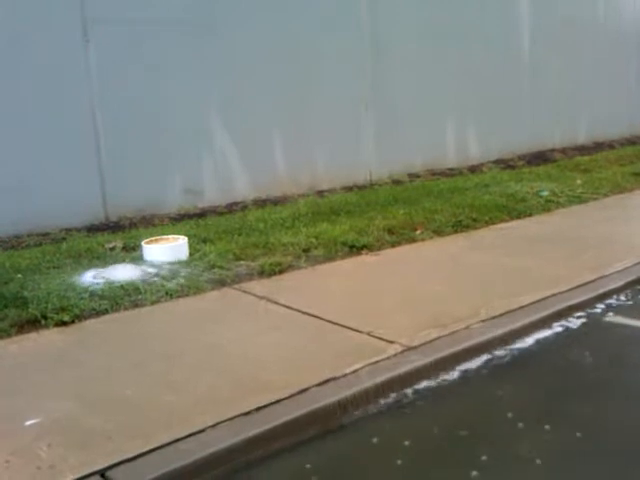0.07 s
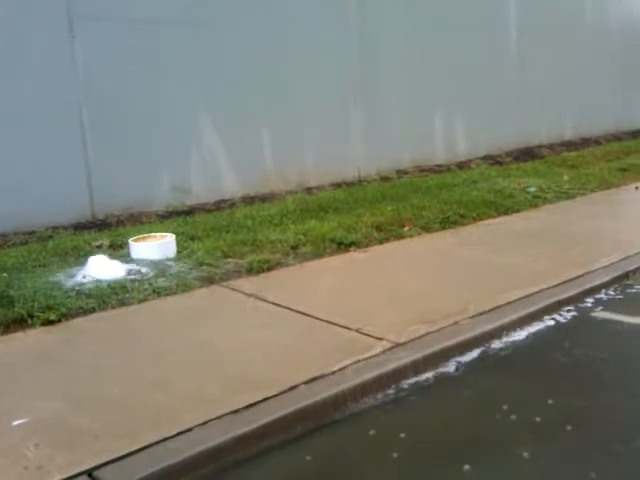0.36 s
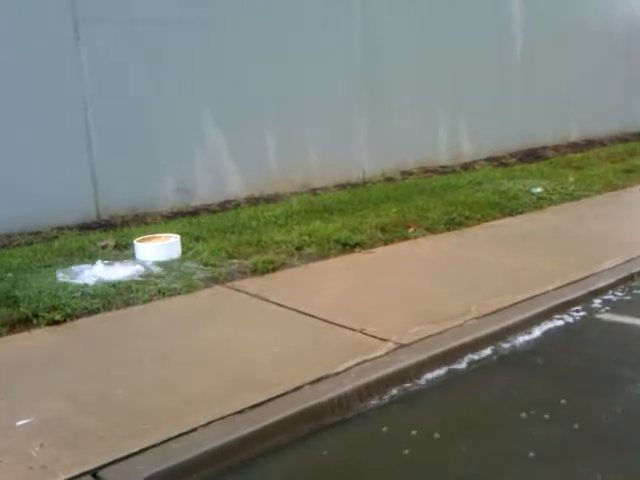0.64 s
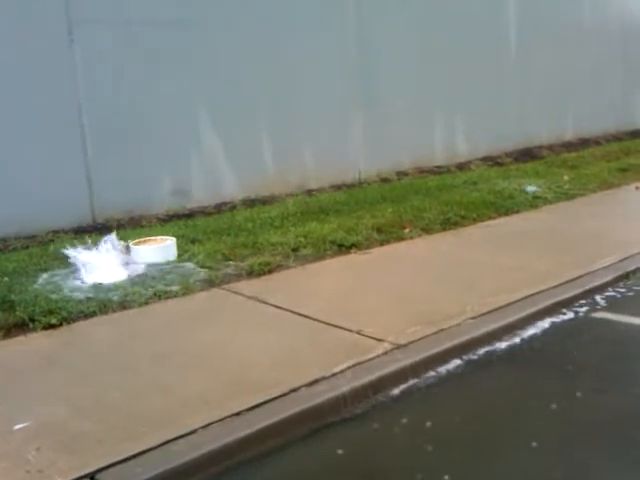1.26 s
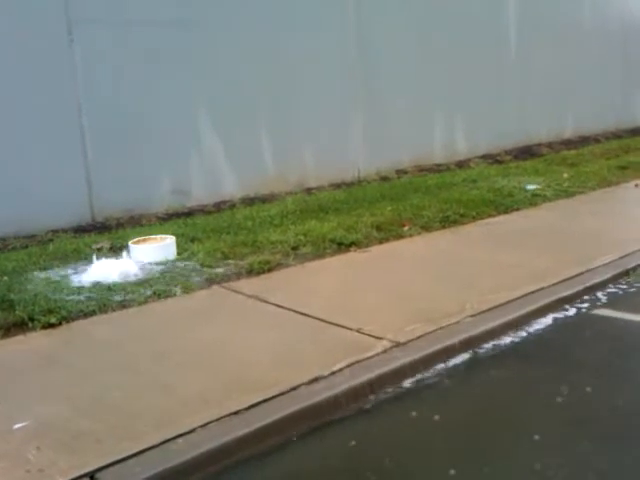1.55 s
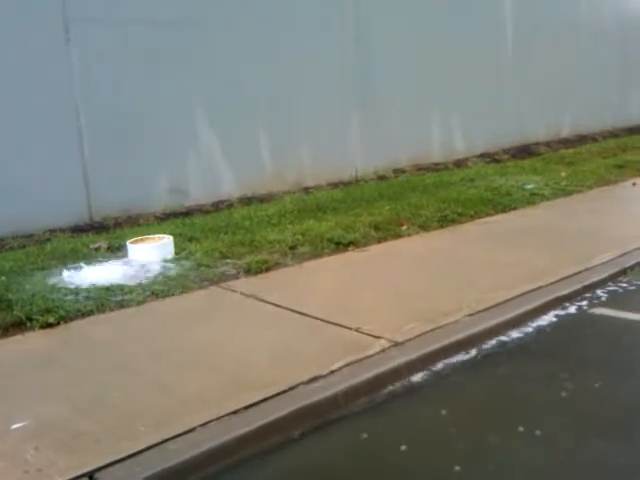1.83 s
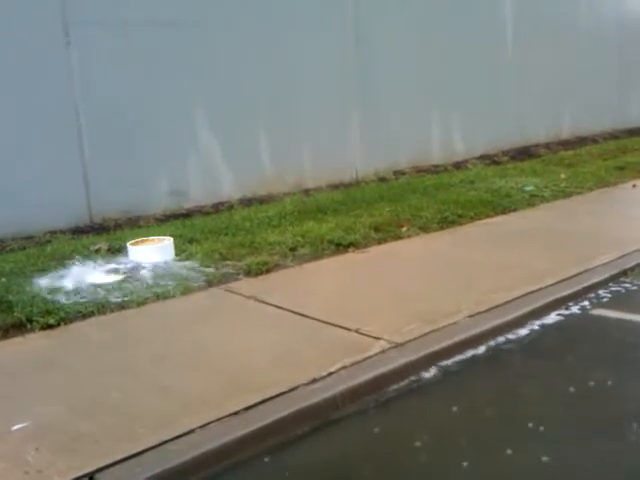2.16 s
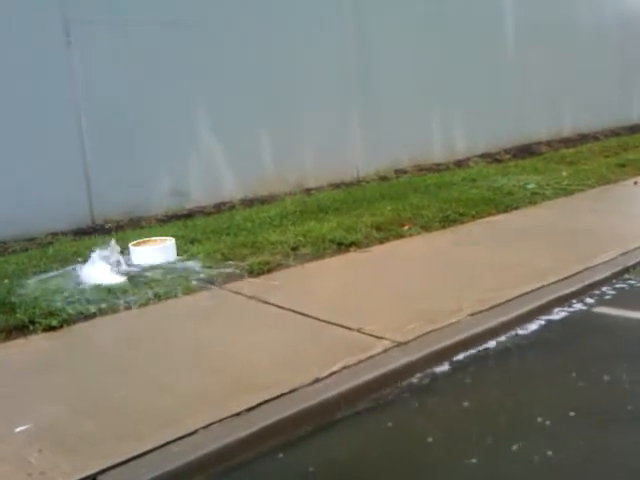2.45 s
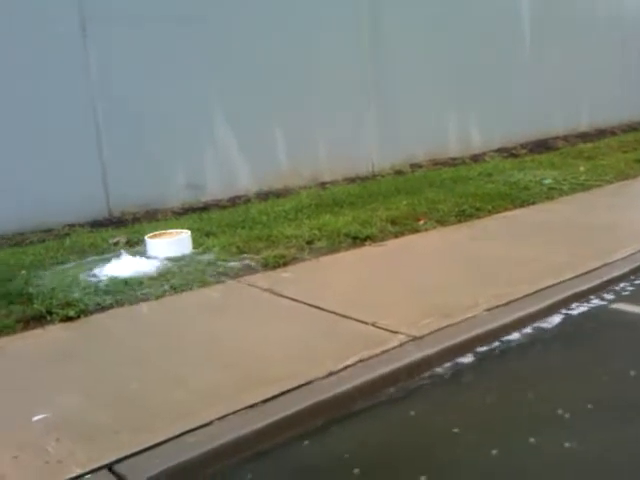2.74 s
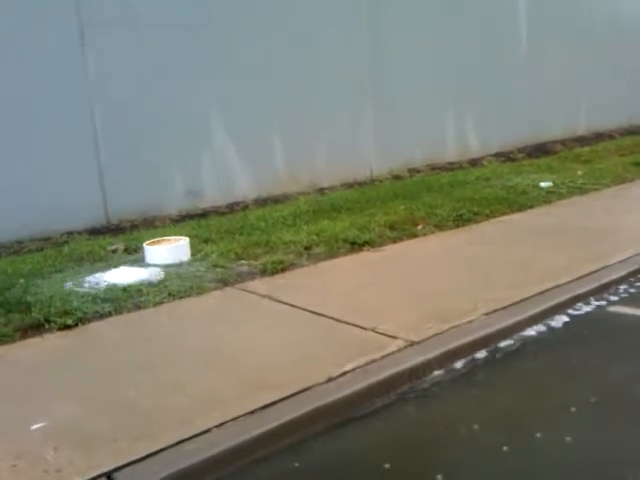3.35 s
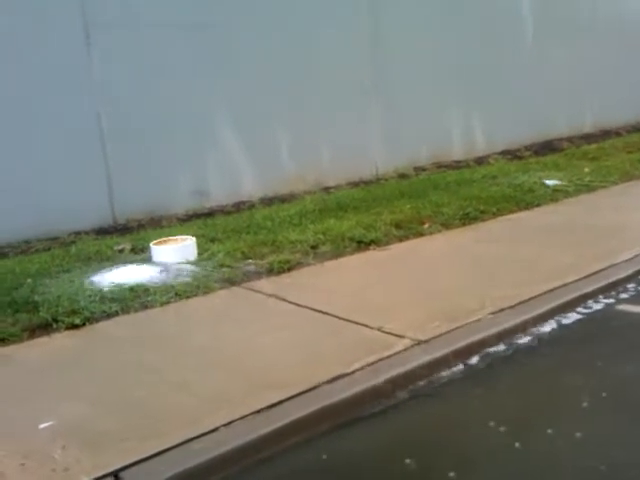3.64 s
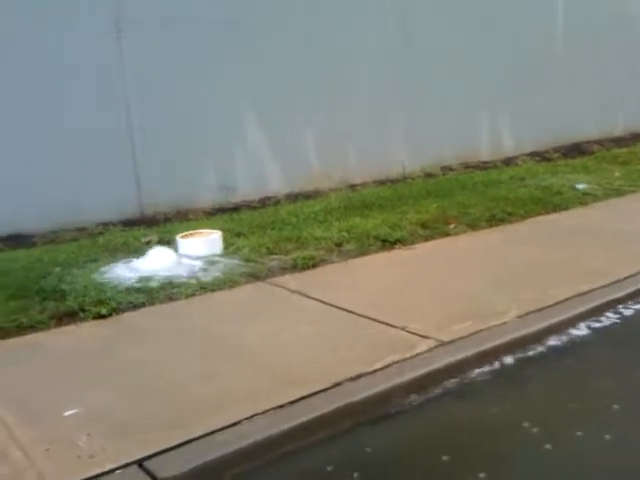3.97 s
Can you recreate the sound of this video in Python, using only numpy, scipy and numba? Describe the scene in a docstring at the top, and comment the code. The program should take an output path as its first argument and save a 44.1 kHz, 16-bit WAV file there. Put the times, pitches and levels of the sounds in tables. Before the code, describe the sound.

Steady rain fizzes on a flooded road edge while welling water splashes and gulps.

```python
"""Steady rain on a flooded road edge, with water welling up beside a pipe in the verge.
Countless tiny bubbles, each a decaying sine, make the rush, a brighter fizz and a fine spray.
Near drops tick, a thin ring swells, the outflow splashes and its large bubbles gulp.
Wall and pavement reflect the water. Under it lie a low rumble and puffs of air,
and a faint hum that comes and goes."""
import sys
import numpy as np
from scipy import signal
from scipy.fft import rfft, irfft
from scipy.io import wavfile
from scipy.ndimage import uniform_filter1d
from numba import njit

SR = 44100
rng = np.random.default_rng(int(sys.argv[2]) if len(sys.argv) > 2 else 0)


def transcribe(signal):
    """Save signal, clipped to [-1, 1], as a 16-bit WAV file at the path in sys.argv[1]."""
    frames = np.atleast_2d(signal).T
    limited = np.clip(frames, -1, 1)
    pcm = np.round(limited * 32767).astype(np.int16)
    wavfile.write(sys.argv[1], SR, pcm)


N = 176400

# air rumble spectrum: f/Hz, relative level/dB
RUMBLE_EQ = [(10, -40), (25, -2), (36, 0), (60, -1), (100, 2.5), (130, -0.5), (170, -1.5), (240, -3),
             (340, -10.5), (600, -43.5)]
# air rumble envelope: t/s, level before trim/dB
RUMBLE_ENVELOPE = [(0, -51), (.06, -52.5), (.33, -52), (.55, -52.5), (.88, -54.5), (1.24, -51.5),
                   (1.45, -54.5), (1.75, -53), (1.95, -54.5), (2.5, -52.5), (2.95, -53.5), (3.12, -52.5),
                   (3.31, -56), (3.43, -46), (3.6, -58), (3.7, -52.5), (4, -52)]
# air puffs: peak t/s, sigma/s, centre f/Hz, level/dB
AIR_PUFFS = [(2.96, 0.019, 65, -48.5), (3.21, .028, 45, -48.5), (3.44, 0.017, 60, -49.5)]
# hum swells: peak t/s, sigma/s, f/Hz, level/dB
HUM_SWELLS = [(0.08, 0.07, 241, -44.5), (.31, 0.05, 242, -47), (.53, .03, 241, -48.5),
              (0.635, .035, 239, -48), (.795, .03, 241, -50.5), (1.265, 0.042, 361, -50),
              (3.746, 0.068, 240, -53)]
# thin ring swells: peak t/s, sigma/s, f/Hz, level/dB
RING_SWELLS = [(2.856, 0.012, 2310, -41.5), (3.705, 0.027, 1955, -43), (3.745, .045, 2250, -45.5),
               (3.968, 0.063, 2237, -46.5)]
# outflow splashes: peak t/s, sigma/s, centre f/Hz, band sigma/oct, level/dB
OUTFLOW_SPLASHES = [(0.663, 0.012, 1315, 0.37, -46), (1.045, .004, 5660, .3, -52),
                    (1.287, 0.014, 700, 1, -47), (1.327, 0.012, 1240, 0.92, -44),
                    (1.385, 0.014, 179, 0.29, -51), (2.11, 0.015, 2270, 0.083, -51),
                    (2.363, 0.049, 440, 0.8, -53.5), (2.856, 0.018, 690, 0.93, -49.5),
                    (3.057, 0.05, 900, 1, -52), (3.227, 0.046, 6000, 0.25, -60),
                    (3.376, 0.016, 340, 0.92, -48), (3.717, 0.026, 2040, 0.19, -45),
                    (3.82, .04, 1700, 0.28, -53), (3.97, 0.037, 2150, 0.19, -46.5)]
# large bubbles: peak t/s, sigma/s, f/Hz, glide/(oct/s), level/dB
OUTFLOW_GULPS = [(.08, .022, 120, 0, -46), (.17, .025, 140, 2, -47), (.32, 0.025, 135, -3, -49),
                 (.455, 0.012, 248, -3, -40.5), (1.375, 0.018, 364, 0, -44), (1.745, .011, 115, -4, -46),
                 (1.815, 0.011, 100, 0, -41.5), (2.18, .025, 420, -6, -52), (2.343, 0.016, 185, 8, -41.5),
                 (2.374, 0.004, 250, 7, -40), (2.59, .025, 410, 5, -52), (2.86, 0.012, 95, -5, -47),
                 (3.033, 0.016, 161, 2, -47), (3.362, 0.012, 250, -4, -41), (3.384, .008, 200, -7, -42),
                 (3.41, 0.022, 100, 0, -46)]
# near drops: peak t/s, sigma/s, f/Hz, level/dB
NEAR_DROPS = [(.1835, .0009, 2900, -41), (.9733, .0007, 3150, -40.5), (1.2128, .0008, 2900, -41),
              (1.4111, .0009, 2670, -34), (1.5626, .00055, 3250, -35.5), (1.7821, .00065, 2650, -30),
              (2.2547, .0006, 3300, -42), (2.529, .0007, 3090, -38.5), (2.8742, .0009, 2650, -38),
              (3.3832, .0006, 3060, -34), (3.6822, .0009, 1960, -34)]
# running water spectrum: f/Hz, relative level/dB
RUSH_EQ = [(200, -6.5), (350, 0.5), (480, -4), (750, -6), (1000, -6.5), (1300, -4), (1650, -4.5),
           (2100, -4), (2800, -7.5), (3400, -14.5), (4100, -20), (7000, -28.5)]
# spray spectrum: f/Hz, relative level/dB
SPRAY_EQ = [(3000, -22), (4000, -10.5), (4700, -3.5), (5500, 0.5), (6200, -3.5), (6800, -8), (7400, -19.5)]
# spray envelope: t/s, level before trim/dB
SPRAY_ENVELOPE = [(0, -60.5), (.06, -61), (.12, -69), (.35, -68), (.45, -63), (.6, -65.5), (.85, -70),
                  (1.2, -67.5), (1.55, -68.5), (1.66, -63.5), (1.8, -67), (1.87, -68.5), (2.68, -67.5),
                  (2.78, -65), (3.12, -68.5), (3.36, -63), (3.48, -65), (3.8, -62.5), (4, -62.5)]
# rain fizz spectrum: f/Hz, relative level/dB
FIZZ_EQ = [(1400, -27), (1850, -7.5), (2100, -7), (2300, -1), (2460, -4), (2680, -11.5), (3200, -20.5),
           (4200, -34)]
# rain fizz envelope: t/s, level/dB
FIZZ_ENVELOPE = [(0, -50), (.5, -49.5), (.9, -53), (1.55, -51), (1.8, -49), (2.2, -51.5), (2.75, -49.5),
                 (3.6, -51.5), (4, -47.5)]

TIME_S = np.arange(N) / SR
BIN_OCT = np.log2(np.maximum(np.arange(N // 2 + 1) * SR / N, 1))


def undb(db):
    """Decibels to gain."""
    return 10 ** (np.asarray(db) / 20)


def unit_rms(x):
    """Scale to rms 1."""
    return x / np.sqrt(np.mean(x ** 2) + 1e-30)


def envelope(points):
    """Gain along (t/s, level/dB) points."""
    return undb(np.interp(TIME_S, *np.array(points).T))


def swell(peak_s, sigma_s):
    """Gaussian rise and fall, peak 1."""
    return np.exp(-.5 * ((TIME_S - peak_s) / sigma_s) ** 2)


def wander(rate_hz):
    """Noise smoothed twice over 1 / rate_hz; rms 1."""
    window = int(SR / rate_hz)
    smoothed = uniform_filter1d(rng.standard_normal(N), window, mode="wrap")
    return unit_rms(uniform_filter1d(smoothed, window, mode="wrap"))


def sine(hz):
    """Sine following a per-sample frequency."""
    return np.sin(2 * np.pi * np.cumsum(hz) / SR)


def equalise(x, points):
    """Filter by (f/Hz, level/dB) points; rms 1."""
    hz, db = np.array(points).T
    gain = undb(np.interp(BIN_OCT, np.log2(hz), db))
    return unit_rms(irfft(rfft(x) * gain, N))


def band(x, hz, sigma_oct):
    """Gaussian band-pass in log frequency; rms 1."""
    gain = np.exp(-.5 * ((BIN_OCT - np.log2(hz)) / sigma_oct) ** 2)
    return unit_rms(irfft(rfft(x) * gain, N))


@njit
def ring_bubbles(onset, hz, cycles, amplitude, rise):
    """Each bubble rings as a sine, its pitch rising by the fraction `rise` as it decays 40 dB."""
    out = np.zeros(N)
    for k in range(len(onset)):
        length = int(cycles[k] * SR / hz[k]) + 2
        step_rad = 2 * np.pi * hz[k] / SR
        phasor = amplitude[k] + 0j
        pole = np.exp(1j * step_rad - 4.6 / length)
        chirp = np.exp(1j * step_rad * rise / length)
        for i in range(length):
            out[(onset[k] + i) % N] += phasor.imag
            phasor *= pole
            pole *= chirp
    return out


def bubble_cloud(low_hz, high_hz, mean_cycles, spread_db, count, rise=.15):
    """Bubbles of random onset, pitch, length and strength."""
    when, pitch, length = rng.random((count, 3)).T
    onset = (when * N).astype(np.int64)
    hz = low_hz * (high_hz / low_hz) ** pitch
    scatter_db = spread_db * np.minimum(rng.standard_normal(count), 2)
    amplitude = hz * undb(scatter_db)  # even power per Hz
    cloud = ring_bubbles(onset, hz, mean_cycles * (.5 + length), amplitude, rise)
    return cloud - cloud.mean()


def air_rumble(trim_db=1.5):
    """Moving air: uneven low noise."""
    return equalise(rng.standard_normal(N), RUMBLE_EQ) * envelope(RUMBLE_ENVELOPE) * undb(trim_db)


def air_puffs():
    """Air hits the microphone in short bursts of low noise."""
    return sum(undb(db) * swell(peak_s, sigma_s) * band(rng.standard_normal(N), hz, sigma_oct=1)
               for peak_s, sigma_s, hz, db in AIR_PUFFS)


def tone_swells(rows, waver, waver_hz, flutter_hz, flutter_db=1.5):
    """Swelling sines; pitch wanders by the fraction `waver`, level by flutter_db."""
    out = np.zeros(N)
    for peak_s, sigma_s, hz, db in rows:
        tone = sine(hz * (1 + waver * wander(waver_hz)))
        out += undb(db + flutter_db * wander(flutter_hz)) * swell(peak_s, sigma_s) * tone
    return out


def hum():
    """A faint, wavering hum comes and goes."""
    return tone_swells(HUM_SWELLS, waver=.01, waver_hz=27, flutter_hz=16)


def wall_reflection(x, lag_s=.025, decay_s=.023, level_db=-18):
    """Short diffuse reflection off wall and pavement."""
    response = rng.standard_normal(N) * (TIME_S > lag_s) * np.exp(-TIME_S / decay_s)
    response /= np.sqrt(np.sum(response ** 2))
    return undb(level_db) * signal.fftconvolve(x, response)[:N]


def thin_ring():
    """A narrow, fluttering ring stands out of the fizz at times."""
    return tone_swells(RING_SWELLS, waver=.013, waver_hz=160, flutter_hz=330)


def splashes():
    """Welling water falls back in bursts of bubbles."""
    cloud = bubble_cloud(250, 7500, mean_cycles=5.4, spread_db=4.5, count=20000)
    return sum(undb(db) * swell(peak_s, sigma_s) * band(cloud, hz, sigma_oct)
               for peak_s, sigma_s, hz, sigma_oct, db in OUTFLOW_SPLASHES)


def gulps(wobble_oct=.09, flutter_db=2.5):
    """Large outflow bubbles ring low and unsteady; most glide up or down."""
    out = np.zeros(N)
    for peak_s, sigma_s, hz, glide_oct_per_s, db in OUTFLOW_GULPS:
        bend_oct = glide_oct_per_s * (TIME_S - peak_s) + wobble_oct * wander(83)
        tone = sine(hz * 2 ** np.clip(bend_oct, -1, 1))
        out += undb(db + flutter_db * wander(110)) * swell(peak_s, sigma_s) * tone
    return out


def near_drops(spatter_decay_s=.007, spatter_db=-18):
    """Each drop ticks for a few cycles and leaves a faint spatter."""
    out = np.zeros(N)
    for peak_s, sigma_s, hz, db in NEAR_DROPS:
        age_s = TIME_S - peak_s
        tick = swell(peak_s, sigma_s) * np.sin(2 * np.pi * hz * age_s)
        tail = (age_s > sigma_s) * np.exp(-np.abs(age_s) / spatter_decay_s)
        spatter = band(rng.standard_normal(N), hz, sigma_oct=.2) * tail
        out += undb(db) * (tick + undb(spatter_db) * spatter)
    return out


def running_water(level_db=-50, wander_db=.1):
    """Bubbles in the flow along the kerb merge into a broad rush."""
    cloud = bubble_cloud(207, 5010, mean_cycles=8.7, spread_db=1.5, count=16000)
    return equalise(cloud, RUSH_EQ) * undb(level_db + wander_db * wander(15))


def rain_spray(trim_db=1.5, wander_db=2):
    """Fine spray: the smallest bubbles hiss above the fizz."""
    cloud = bubble_cloud(3200, 11000, mean_cycles=5.6, spread_db=0, count=14000)
    gain = envelope(SPRAY_ENVELOPE) * undb(trim_db + wander_db * wander(41))
    return equalise(cloud, SPRAY_EQ) * gain


def rain_fizz(wander_db=1.47):
    """Rain on the water makes a bright fizz of tiny bubbles."""
    cloud = bubble_cloud(1467, 3790, mean_cycles=14, spread_db=1, count=9000)
    gain = envelope(FIZZ_ENVELOPE) * undb(wander_db * wander(52))
    return equalise(cloud, FIZZ_EQ) * gain


def scene():
    """Water, its reflection, air and hum; mono."""
    water = running_water() + rain_fizz() + rain_spray() + near_drops()
    water += splashes() + gulps() + thin_ring()
    return (water + wall_reflection(water) + air_rumble() + air_puffs() + hum())[None]


def record(dry):
    """Recorder: steep elliptic low-pass."""
    cutoff_hz = 7250
    return signal.sosfilt(signal.ellip(12, .2, 80, cutoff_hz, fs=SR, output="sos"), dry)


dry = scene()
out = record(dry)
transcribe(out)
```